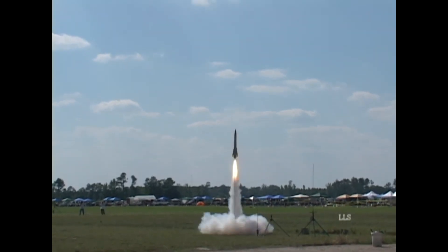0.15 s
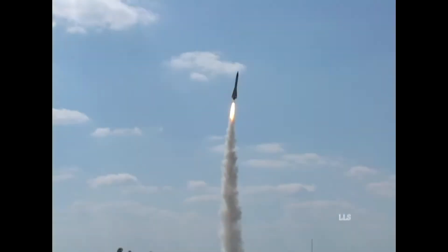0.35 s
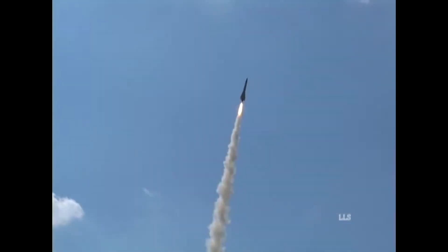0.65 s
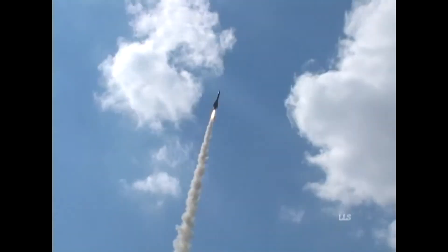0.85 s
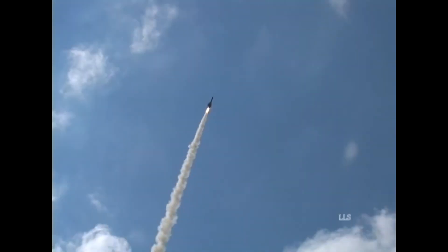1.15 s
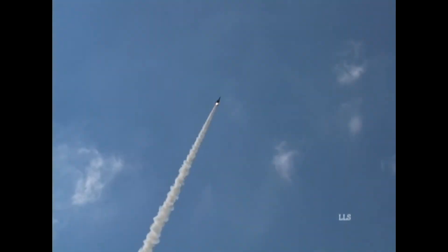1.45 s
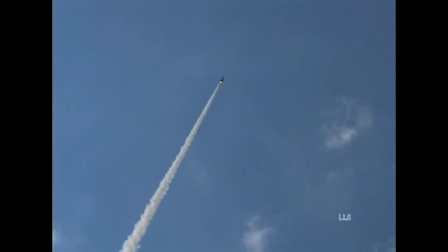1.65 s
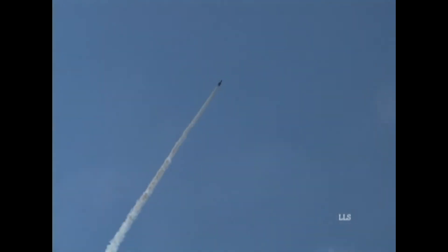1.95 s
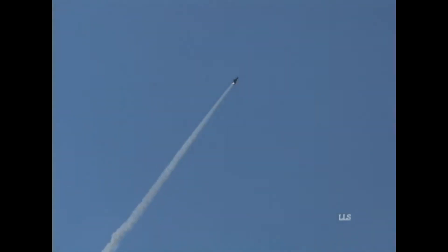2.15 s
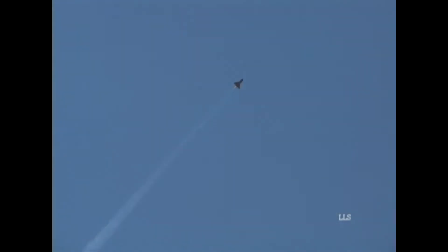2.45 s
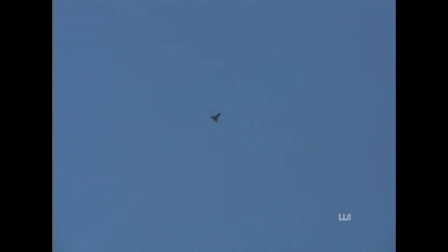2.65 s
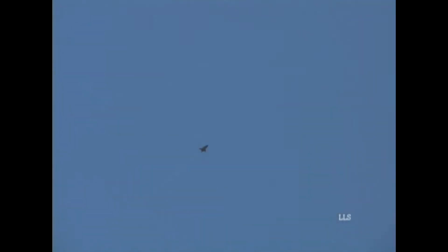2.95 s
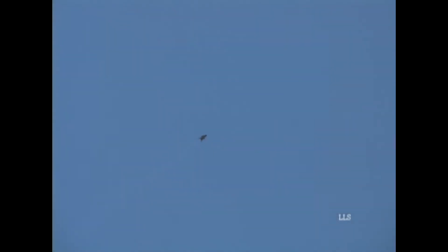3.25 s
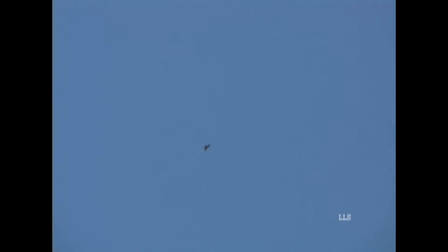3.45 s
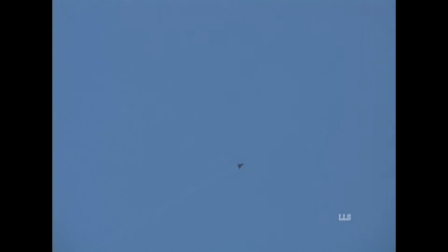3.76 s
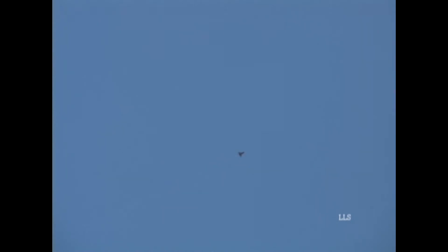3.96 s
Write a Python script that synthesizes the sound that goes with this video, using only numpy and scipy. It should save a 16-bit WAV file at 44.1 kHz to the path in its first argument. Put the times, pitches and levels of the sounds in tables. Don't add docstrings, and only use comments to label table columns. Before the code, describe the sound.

A rocket motor cracks alight and roars in a harsh, crackling, overloaded rush that fades as it climbs, leaving a faint whistle and small knocks.

```python
import sys
import numpy as np
from scipy import signal
from scipy.fft import rfft, irfft
from scipy.io import wavfile
from scipy.ndimage import uniform_filter1d

SR = 44100
rng = np.random.default_rng(int(sys.argv[2]) if len(sys.argv) > 2 else 0)


def store_wav(level_fs):
    pcm = np.round(np.clip(np.atleast_2d(level_fs), -1, 1) * 32767)
    wavfile.write(sys.argv[1], SR, pcm.T.astype(np.int16))


def field_ratio(decibels):
    return 10 ** (np.asarray(decibels, dtype=float) / 20)


N = 180809
T = np.arange(N) / SR


def evened(x):
    return x / np.sqrt(np.mean(x ** 2) + 1e-20)


def read(points, hz):
    f, value = np.transpose(points)
    return np.interp(np.log(hz + 1), np.log(f + 1), value)


def columns(rows, t):
    s, *rest = np.transpose(rows)
    return [np.interp(t, s, c) for c in rest]


def band(x, lo_hz, hi_hz, order=2):
    return signal.sosfilt(signal.butter(order, [lo_hz, hi_hz], "band", fs=SR, output="sos"), x)


def resonate(x, hz, width):
    turn = np.exp(2j * np.pi * np.cumsum(hz * np.ones(N)) / SR)
    r = np.exp(-np.pi * width / SR)
    smooth = signal.lfilter([1 - r], [1, -r], x / turn)
    return 2 * (turn * smooth).real


def drift(hz, channels=1):
    low_pass = signal.butter(2, hz, fs=SR, output="sos")
    return evened(signal.sosfilt(low_pass, rng.standard_normal((channels, N))))


def pair(a, b, side_db, pan_db):
    b = b * field_ratio(side_db)
    return np.array([(a + b) * field_ratio(pan_db / 2), (a - b) * field_ratio(-pan_db / 2)])


def coloured(spectrum):
    gain = field_ratio(read(spectrum, np.fft.rfftfreq(N, 1 / SR)))
    return evened(irfft(rfft(rng.standard_normal((2, N))) * gain, N))


def igniter():
    # frequency in Hz, level in dB per Hz.
    sizzle = [(35, -30.5), (60, 4), (319, -16), (394, -16.5), (672, -12.5), (1910, -19.5), (2200, -18),
              (6540, -28), (15400, -44.5)]
    return field_ratio(-42.5) * pair(*coloured(sizzle), -4.0, 0) * (T < .07)


def field():
    # frequency in Hz, level in dB per Hz.
    ground_hiss = [(59, -32.5), (100, -0.5), (201, -3.5), (402, -7), (859, -4.5), (1960, -11), (2320, -11),
                   (4180, -24.5), (15400, -30.5)]
    # peak time in seconds, peak level in dB, half length in seconds.
    gust_times = [
        (0.107, -43.5, 0.17),
        (.4, -50, 0.27),
        (0.746, -47, 0.11),
        (2.121, -50.5, 0.16),
        (3.751, -60.5, 0.41),
    ]
    calm_db, gust_fall_db, lump_db = -69., -12., 3.
    wind = pair(*evened(band(rng.standard_normal((2, N)), 30., 130.0)), -5.0, 0)
    swells = sum(field_ratio(db + gust_fall_db * ((T - s) / half) ** 2) for s, db, half in gust_times)
    wind *= field_ratio(lump_db * drift(9.6)) * (field_ratio(calm_db) + swells)
    return wind + field_ratio(-60) * pair(*coloured(ground_hiss), -0.5, 0)


def burn_levels(t):
    # time in seconds, loudness in dB,
    # brightness in dB of the plume side that faces the camera.
    burn = [(.078, -13, -16), (.095, -9.5, -15), (.16, -9.5, -12.5), (.21, -6.5, 5), (.26, -7.5, 1),
            (.3, -8.5, 4.5), (.35, -10.5, -3.5), (.42, -8, 5), (.49, -10.5, 1.5), (.7, -10, 10),
            (.77, -10.5, 0.5), (1.1, -13.5, -8.5), (1.48, -15, -7.5), (1.53, -18.5, -7.5),
            (1.95, -27, -5.5), (2.06, -29, -18), (2.13, -30.5, -17.5), (2.19, -34, -2)]
    # Rumble, roar, rasp and hiss at zero brightness, each a level in dB.
    base_db = (-28.5, 0.5, 5., -0.5)
    per_bright = (-0.4, 0.069, 0.78, 0.99)
    pad_clear_s, pad_rumble_db, pad_rasp_db = .08, 21., 5.5
    rumble_db_per_s = 9.5
    tail_s, tail_db_per_s = 2.21, -300.
    loud_db, bright_db = columns(burn, t)
    share_db = np.array(base_db)[:, None] + np.outer(per_bright, bright_db)
    on_pad = np.exp(-(t / pad_clear_s / 2) ** 2)
    share_db[2] += pad_rasp_db * on_pad
    share_db -= 10 * np.log10((field_ratio(share_db[1:]) ** 2).sum(0))
    share_db[0] = base_db[0] + per_bright[0] * bright_db + rumble_db_per_s * t + pad_rumble_db * on_pad
    return loud_db + share_db + tail_db_per_s * np.maximum(t - tail_s, 0)


def shock(ms):
    u = np.arange(512) / (ms * SR / 1000)
    return (1 - u) * np.exp(-u)


def shock_train(spread_db=2.0):
    # time in seconds, log10 of shocks per second.
    density = [(0, 3.49), (1.3, 3.27), (1.8, 3.26), (2.0, 2.8), (2.15, 2.33)]
    chance = 10 ** columns(density, T)[0] / SR
    size = field_ratio(spread_db * np.minimum(rng.exponential(1, (2, N)), 5))
    train = size * (rng.random((2, N)) < chance) / np.sqrt(chance)
    return train * np.clip((2.14 - T) / 0.011, 0, 1) / np.std(train[0])


def jet():
    # lower edge in Hz, upper edge in Hz.
    jet_bands = [
        (150, 450),
        (600, 1100),
        (1400, 3200),
        (4000, 8000),
    ]
    # frequency in Hz, level in dB.
    jet_shape = [(12, -41), (70, -32), (140, -9.5), (260, -2.5), (800, 0), (1200, 0.5), (1500, 0),
                 (2100, -1.5), (2900, 2.5), (3600, 1), (4400, 4), (5700, 0), (9000, -6.5), (10500, -13),
                 (15500, -23.5)]
    # frequency in Hz, level in dB.
    side_shape = [(60, -5), (150, -15), (380, -11), (950, -16.5), (2380, -5.5), (5980, -8.5), (15000, -8)]
    # frequency in Hz, left minus right in dB.
    lean = [(60, -7.5), (150, -1.5), (380, 0.5), (950, 0.5), (2380, 2.5), (5980, 3.5), (15000, -3)]
    # frequency in Hz, phase in radians.
    lead = [(200, .05), (700, .17), (2400, .4), (6000, .15), (8000, .35), (13000, .6)]
    crackle_hz, smooth_db, patch_db, gust_db = 2310.0, -8.0, 1.0, 0.94
    hz = np.fft.rfftfreq(512, 1 / SR)
    front = shock(0.37)
    crackle = signal.oaconvolve(shock_train(), front[None])[:, :N]
    t, z = signal.stft(crackle, SR, nperseg=512, noverlap=384)[1:]
    z /= (abs(rfft(front)) + 1e-3)[:, None]
    hiss = signal.stft(rng.standard_normal((2, N)), SR, nperseg=512, noverlap=384)[2]

    share = 1 / (1 + (hz[:, None] / crackle_hz) ** 4.)
    hiss_power = 1 - share + field_ratio(smooth_db) ** 2 * (t < 2.14)
    z = np.sqrt(share) * z + np.sqrt(hiss_power) * hiss

    lo, hi = np.transpose(jet_bands)
    levels = burn_levels(t)
    levels -= 10 * np.log10(2 * (hi - lo) / SR)[:, None]
    where = np.interp(np.log(hz + 1), np.log(lo * hi) / 2, np.arange(len(lo)))
    blend = np.maximum(1 - abs(where[:, None] - np.arange(len(lo))), 0)
    patches = uniform_filter1d(rng.standard_normal(z.shape[1:]), 12, 0)
    patches = evened(uniform_filter1d(patches, 20, 1))
    air_db = -10. * np.maximum(hz[:, None] / 8140.0 - .7, 0) * t
    z *= field_ratio(blend @ levels + air_db + read(jet_shape, hz)[:, None] + patch_db * patches)

    z = pair(*z, read(side_shape, hz)[:, None] - 5.5, read(lean, hz)[:, None])
    z[1] *= np.exp(-1j * read(lead, hz))[:, None]
    roar = signal.istft(z, SR, nperseg=512, noverlap=384)[1][:, :N]
    burning = np.clip((T - .059) / .014, 0, 1) ** 2 * np.clip((2.25 - T) / .02, 0, 1)
    return roar * burning * field_ratio(gust_db * drift(18.0))


def pops():
    # time in seconds, peak in dB, length in ms.
    chamber_pops = [(.0652, -14, .3), (.0686, 3, .4), (.0706, -6, .25), (.0719, 2, .2), (.0729, 2, .17),
                    (.0737, 0, .17), (1.4872, 2, .25), (2.0968, -11, .25), (2.1115, -14, .25),
                    (2.121, -14, .22), (2.1568, -11, .25), (2.1633, -18, .25), (2.1748, -21, .25),
                    (2.178, -12, .2), (2.1823, -17, .25), (2.188, -19, .3), (2.1901, -16, .35),
                    (2.2268, -15, .28), (2.415, -19.5, .2), (2.417, -30, .35), (2.4256, -21, .3),
                    (2.6605, -40, .3)]
    # time in seconds, peak in dB, length in ms.
    pushes = [
        (.0684, -4, 1.0),
        (.0722, -3, 1.3),
        (.08, -20, 4.),
        (1.487, -20, 1.0),
        (2.19, -27, 1.0),
        (2.4152, -36, 1.1),
        (2.426, -37, 1.1),
    ]
    # time in seconds, peak in dB, length in ms.
    suck = (2.4492, -35, .3)
    out = np.zeros(N + 4096)
    for sign, (s, db, ms) in [(1, row) for row in chamber_pops + pushes] + [(-3.0, suck)]:
        u = np.arange(4096) / (ms * SR / 1000)
        out[round(s * SR):][:4096] += sign * field_ratio(db) * np.cos(u + .25) * np.exp(-.42 * u)
    rounded = signal.lfilter(*signal.bessel(3, 3200., fs=SR), out[:N])
    return rounded * field_ratio([[.5], [-.5]])


def ground(x):
    distance_m, climb_m_per_s2, mic_height_m, sound_m_per_s = 60., 104., 2.04, 343.
    grazing_echo, echo_gain, steep_echo = .17, 1.3, .8
    rise = np.sin(np.arctan2(climb_m_per_s2 * T ** 2 / 2, distance_m))
    strength = np.minimum(grazing_echo + echo_gain * rise, steep_echo)
    dull = signal.lfilter(*signal.butter(1, 1700., fs=SR), x)
    late = np.arange(N) - 2 * mic_height_m * rise / sound_m_per_s * SR
    return x + strength * np.array([np.interp(late, np.arange(N), c) for c in dull])


def flight():
    # time in seconds, level in dB.
    flow = [(2.2, -63), (2.57, -59), (2.8, -68), (3.08, -58), (3.27, -64), (3.46, -60), (3.58, -68),
            (3.95, -76), (4.1, -61.5)]
    t = np.maximum(T - 2.2, 0)
    flow_db = columns(flow, T)[0]
    edge_hz, sag_hz, sag_s, wide_ratio = 2620., 800., 2.8, 1.12
    line_hz = edge_hz - sag_hz * (1 - np.exp(-t / sag_s))
    line_gain = field_ratio(flow_db - 3.)
    wake = field_ratio(-46 - 30.5 * t)
    wide_gain = np.hypot(field_ratio(flow_db + 2), wake)
    rush = field_ratio(-44.5 - 12 * t - 120. * np.maximum(T - 2.54, 0))
    linger = field_ratio(-57. - 27 * t)
    rush_gain = np.hypot(rush, field_ratio(flow_db - 17.5) + linger)
    return wide_gain, wide_ratio * line_hz, line_gain, line_hz, rush_gain, 2 - 0.5 * t


def coasting(flutter_db=1.0):
    wide_gain, wide_hz, line_gain, line_hz, rush_gain, pan_db = flight()
    noise = rng.standard_normal((6, N))
    wide = [evened(resonate(resonate(n, wide_hz, 900.), wide_hz, 900.)) for n in noise[:2]]
    line = [evened(resonate(resonate(n, line_hz, 33.0), line_hz, 33.0)) for n in noise[2:4]]
    core = np.sin(2 * np.pi * np.cumsum(line_hz + 12. * drift(30.)[0]) / SR)
    line[0] = .6 * line[0] + 1.5 * core
    whistle = pair(*(wide_gain * np.array(wide) + line_gain * np.array(line)), -7.0, pan_db)
    rush = band(noise[4:], 3500.0, 5140.0) + 0.7 * band(noise[4:], 1100., 2300.)
    rush = pair(*evened(rush), -8.0, pan_db)
    flight_noise = field_ratio(flutter_db * drift(25.)) * whistle + rush_gain * rush
    return flight_noise * np.clip((T - 2.2) / .05, 0, 1)


def tree_line(lump_db=1.5):
    # start in seconds, level in dB, fall in dB per second.
    echoes = [
        (2.2, -37.5, -380),
        (2.25, -59, -15),
        (2.66, -52, -54),
        (4.083, -54, -20),
    ]
    rest_db = -75
    far = pair(*evened(band(rng.standard_normal((2, N)), 230.0, 930.0)), -8.5, 0)
    bursts = sum(field_ratio(db + fall_db * abs(T - s)) * (T > s) for s, db, fall_db in echoes)
    return (field_ratio(rest_db) + bursts) * field_ratio(lump_db * drift(67.0)) * far * (T > 2.2)


def knocks(echo_db=-11.0, rise_s=0.00063):
    # start in seconds, peak in dB, ring in Hz,
    # 60 dB decay time in seconds, tick in dB.
    taps = [
        (3.0629, -29.5, 480, 0.021, -19),
        (3.269, -57, 763, .02, -3),
        (3.4542, -43.5, 497, 0.02, -6.5),
        (3.912, -29.5, 557, 0.014, -16.5),
        (4.0754, -44, 672, .013, -6),
    ]
    pan_db, echo_s = -10.5, .0102
    out, t = np.zeros((2, N + 4096)), np.arange(4096) / SR
    ticks = band(rng.standard_normal((len(taps), 4096)) * field_ratio(-60 * t / .008), 1600., 4600.)
    for (s, db, hz, t60, tick_db), tick in zip(taps, ticks):
        overtone = .5 * np.sin(2 * np.pi * 1.72 * hz * t) * field_ratio(-60 * t / 0.0087)
        ring = overtone - np.sin(2 * np.pi * hz * t)
        ring *= field_ratio(-60 * t / t60) * (1 - np.exp(-t / rise_s)) ** 2
        ring += field_ratio(echo_db) * np.roll(ring, round(echo_s * SR))
        hit = ring / abs(ring).max() + field_ratio(tick_db) * tick / abs(tick).max()
        out[:, round(s * SR):][:, :4096] += field_ratio(db + np.array([[.5], [-.5]]) * pan_db) * hit
    return out[:, :N]


def scene():
    motor = igniter() + ground(field_ratio(-0.5) * jet() + pops())
    return field() + motor + coasting() + tree_line() + knocks()


def top_cut(x):
    return signal.sosfilt(signal.butter(12, 15600, fs=SR, output="sos"), x)


def record(dry):
    knee, ceiling = 9., 1.04
    loud = dry / ceiling
    squeezed = ceiling * loud / (1 + abs(loud) ** knee) ** (1 / knee)
    blocked = signal.lfilter(*signal.butter(1, 15., "high", fs=SR), squeezed)
    return top_cut(blocked)


dry = scene()
out = record(dry)
store_wav(out)
```